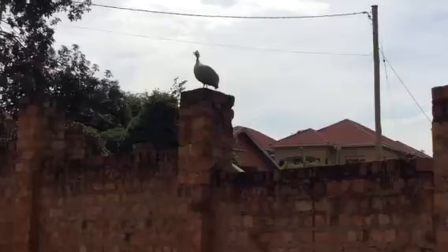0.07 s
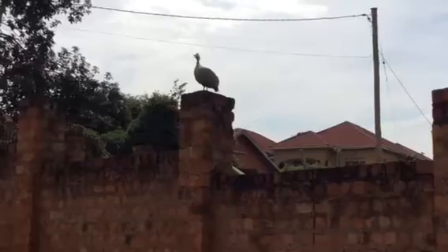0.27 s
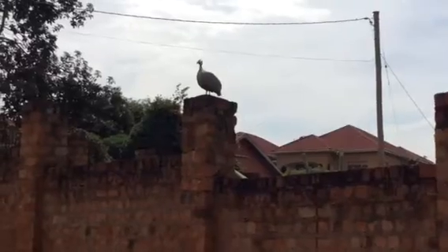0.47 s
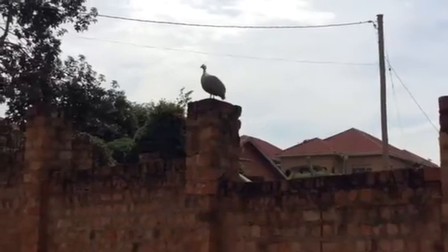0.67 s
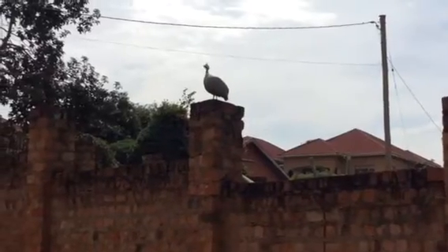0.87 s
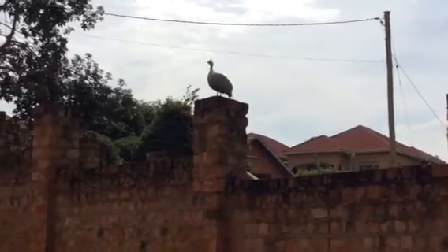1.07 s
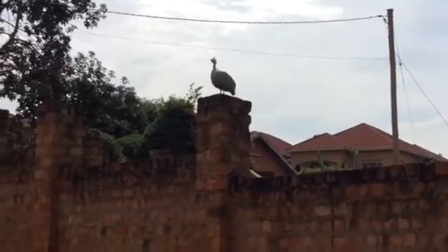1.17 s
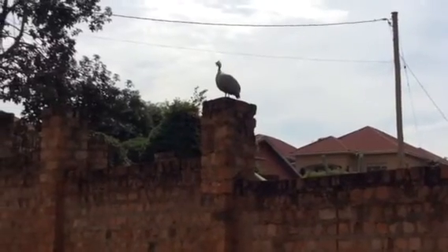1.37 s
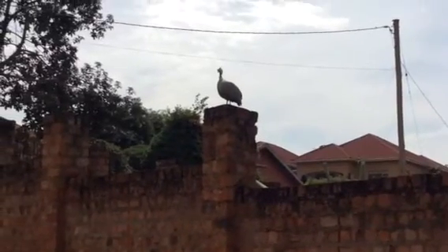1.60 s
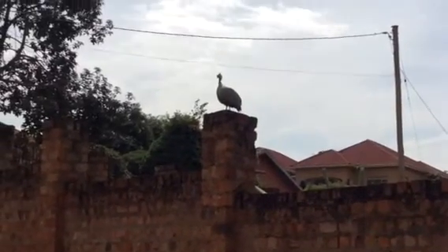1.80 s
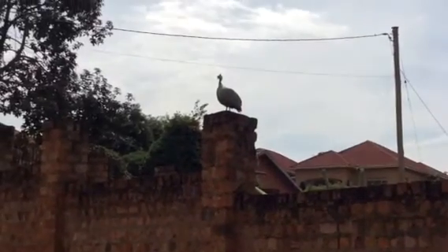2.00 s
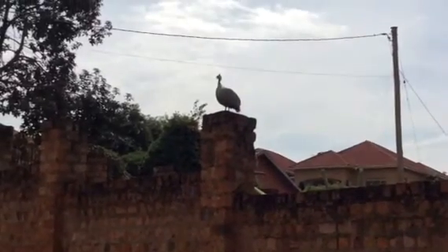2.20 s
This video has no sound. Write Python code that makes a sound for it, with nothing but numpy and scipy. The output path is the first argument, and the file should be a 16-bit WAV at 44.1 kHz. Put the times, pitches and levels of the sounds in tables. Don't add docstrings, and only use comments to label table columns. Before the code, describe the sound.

A guinea fowl gives seven short, harsh, rising calls that ring off nearby yard walls.

```python
import sys
import numpy as np
from scipy import signal
from scipy.fft import rfft, irfft
from scipy.io import wavfile
from scipy.ndimage import uniform_filter1d

SR = 44100
rng = np.random.default_rng(int(sys.argv[2]) if len(sys.argv) > 2 else 0)


def voltage_ratio(level):
    return 10 ** (np.asarray(level, float) / 20)


def digitize_waveform(pressure):
    field = np.atleast_2d(pressure).T
    bounded = np.clip(field, -1, 1)
    quanta = np.round(bounded * 32767).astype(np.int16)
    wavfile.write(sys.argv[1], SR, quanta)


N = 99225


def ring(f, hz, width):
    return 1j * f * width / (hz ** 2 - f ** 2 + 1j * f * width)


def shape(x, gain):
    f = np.arange(len(x) // 2 + 1) * SR / len(x) + 1e-3
    return irfft(rfft(x) * gain(f), len(x))


def noise_band(count, hz):
    return shape(rng.standard_normal(count), lambda f: np.exp(-(np.log2(f / hz) * 2) ** 2))


def on_log_hz(hz, table):
    points, values = np.transpose(table)
    return np.interp(np.log(hz), np.log(points), values)


def level(x, db):
    return x * voltage_ratio(db) / np.sqrt(np.mean(x ** 2))


def unit_energy(x):
    return x / np.sqrt(np.sum(x ** 2))


def walk(rate):
    hold = int(SR / rate)
    steps = np.repeat(rng.standard_normal(N // hold + 1), hold)
    return 1.28 * uniform_filter1d(uniform_filter1d(steps, hold), hold)[:N]


def add(out, x, s):
    i = int(s * SR)
    out[i:i + len(x)] += x[:len(out) - i]


# [hz, level_db per Hz]
TOWN_SPECTRUM = [(15, -43), (25, -29), (59, -4), (523, -13.5), (684, -13), (872, -21.5), (1140, -17),
                 (1240, -16.5), (15500, -34)]


def town():
    swell_db, flicker_db = 0.1, 2
    out, swell = 0, walk(1.43)
    for hz in 25 * 2 ** np.arange(0, 9.6, .5):
        band = noise_band(N, hz)
        db = on_log_hz(hz, TOWN_SPECTRUM)
        out = out + band * voltage_ratio(db + swell_db * swell + flicker_db * walk(8.88))
    return level(out, -66)


def throat_pulses(length, hz0, hz1, dip_db, chance):
    jitter, shimmer_db = .009, 1.6
    rise_share = 0.7685
    attack_s, release_s = .011, 0.022
    t = np.zeros(len(chance))
    for k in range(1, len(t)):
        climb = min(t[k - 1] / length / rise_share, 1)
        hz = hz0 + (hz1 - hz0) * np.sin(np.pi / 2 * climb)
        t[k] = t[k - 1] + (1 + jitter * chance[k, 0]) / hz
    effort = np.clip((t + attack_s / 5) / attack_s, 0, 1) * np.clip((length - t) / release_s, 0, 1)
    dip = np.exp(-((t / length - 0.62) / 0.065) ** 2)
    return t, effort * voltage_ratio(shimmer_db * chance[:, 1] + dip_db * dip)


# [shut_hz, open_hz, width_hz, shut_db, open_db]
TRACT_RESONANCES = [(2095, 1704, 523, 2.5, 0.5), (2500, 2386, 870, -10, -19.5), (3493, 4370, 530, -4, 2.5),
                    (4220, 4757, 800, -6, 0), (5260, 5050, 214, -24, -4.5), (6500, 6840, 218, -20, -8.5),
                    (8350, 7740, 3880, -29.5, -16), (11600, 14760, 2000, -58, -24)]


def tract(f, t, length, chest_db, stretch, upper_db, late_db):
    beak = (1 - np.exp(-t / .022))[:, None]
    late = np.clip(2 * t / length - 1, -1, 1)[:, None]
    response = voltage_ratio(chest_db - 13 * beak) * ring(f, 1166, 640) ** 2
    for k, (shut_hz, open_hz, width, shut_db, open_db) in enumerate(TRACT_RESONANCES):
        db = shut_db + (open_db - shut_db) * beak
        db = db + upper_db * (k in (3, 4)) + late_db * (k == 0) * late
        hz = stretch * (shut_hz + (open_hz - shut_hz) * beak)
        response = response + voltage_ratio(db) * ring(f, hz, width) ** 2
    return response


def pulse_source(f, effort, air, size):
    t = np.arange(air.shape[1]) / SR
    puff = air * np.exp(-t / .0013)
    hiss = np.roll(air, 99, axis=1) * np.exp(-t / 0.0029)
    hiss = hiss / np.sqrt(np.sum(hiss ** 2, axis=1, keepdims=True))
    high = 1 / (1 + (7130 / f) ** 8)
    source = 1 + .5 * rfft(puff / np.sqrt(np.mean(puff ** 2) * air.shape[1]), size)
    source = source * (1 - 0.84 * high) + high * rfft(hiss, size)
    return source * (effort[:, None] + 1e-6) ** (0.27 * high)


# [centre_hz, width_hz, level_db]
NECK_PARTIALS = [(363, 125, -25.5), (730, 310, -28.5)]
# [centre_hz, width_hz, depth (0-1)]
SIDE_CAVITIES = [(5535, 133, 0.54), (8060, 200, 0)]


def call(length, db, hz0, hz1, tilt_db, chest_db, dip_db, stretch, upper_db, late_db):
    size, pulses = 8192, 40
    chance, air = rng.standard_normal((pulses, 2)), rng.standard_normal((pulses, 256))
    t, effort = throat_pulses(length, hz0, hz1, dip_db, chance)
    f = np.arange(size // 2 + 1) * SR / size + 0.00082
    colour = voltage_ratio(tilt_db * np.log2(f / 3000 + 0.033)) / (1 + (520 / f) ** 4)
    voiced = colour * pulse_source(f, effort, air, size)
    voiced = voiced * tract(f, t, length, chest_db, stretch, upper_db, late_db)
    for hz, width, partial_db in NECK_PARTIALS:
        voiced = voiced + voltage_ratio(partial_db) * ring(f, hz, width) ** 2
    for hz, width, depth in SIDE_CAVITIES:
        voiced = voiced * (1 - depth * ring(f, hz, width))
    delay = np.exp(-2j * np.pi * f * t[:, None])
    x = irfft(np.sum(effort[:, None] * voiced * delay, axis=0), size)
    return level(x, db) * np.sqrt(length * SR / size)


# [start_s, length_s, level_db, first_pitch_hz, last_pitch_hz]
CALLS = [
    (.113, 0.069, -43, 340.8, 362),
    (0.393, 0.07, -43, 340, 364.3),
    (0.677, 0.056, -43, 331.2, 360.5),
    (0.945, 0.059, -43.5, 325.5, 367.6),
    (1.177, 0.0635, -44, 338, 366.5),
    (1.47, 0.053, -47.5, 339.5, 359),
    (1.737, 0.0636, -46.5, 325.6, 360.6),
]
# [brightness_db per octave, chest_db, mid_call_effort_db]
POSTURES = [(2.5, -7, -5.5), (2, -11.5, -2.5), (1.5, -7.5, 3), (2.5, -2.5, 4), (0.5, -9.5, 2),
            (-1.5, -13, 2), (0.5, -5, -4)]
# [length scale, upper_resonances_db, first_resonance_late_lift_db]
TRACT_STRETCH = [(1.004, 1.5, -4.5), (1.006, 1.5, -0.5), (1.01, -.5, -1), (0.995, 3.5, -2), (1, 0.5, 1.5),
                 (.99, -2, 0.5), (0.998, -1, -7.5)]


def guinea_fowl():
    out = np.zeros(N)
    for (s, *voice), posture, stretch in zip(CALLS, POSTURES, TRACT_STRETCH):
        add(out, call(*voice, *posture, *stretch), s)
    return out


# [delay_s, level_db]
WALL_ECHOES = [(.011, -3.5), (0.036, -9.5), (0.061, -15), (.085, -17.5), (.118, -24.5)]
# [hz, t60_s]
TAIL_T60 = [(1000, 1), (2000, 0.48), (4500, 0.45), (7000, 0.82), (12000, 0.4)]
# [pitch_hz, level_db, t60_s]
WALL_FLUTTER = [(1822, -25, .8), (4020, -31, .6), (4600, -30, .6)]


def yard(x):
    onset_s = 0.043
    t = np.arange(SR) / SR
    tail = 0
    for hz in 350 * 2 ** np.arange(0, 5.6, .5):
        tail = tail + noise_band(SR, hz) * voltage_ratio(-60 * t / on_log_hz(hz, TAIL_T60))
    tail = voltage_ratio(-11) * unit_energy(tail * (1 - np.exp(-t / onset_s)))
    scatter = rng.standard_normal(SR) * np.exp(-t / 0.0072) * (t > .0005)
    tail = tail + voltage_ratio(-7.5) * unit_energy(scatter)
    for s, db in WALL_ECHOES:
        smear = rng.standard_normal(1024) * np.exp(-t[:1024] / 0.0076)
        add(tail, voltage_ratio(db) * unit_energy(smear), s)
    for hz, db, t60 in WALL_FLUTTER:
        tone = np.sin(2 * np.pi * hz * t) * np.minimum(t / onset_s, 1) / 100
        tail = tail + voltage_ratio(db - 60 * t / t60) * tone
    return x + signal.fftconvolve(x, tail)[:N]


# [start_s, peak_db, length_s]
CASE_BUMPS = [
    (.5765, -48.5, .004),
    (2.085, -53, 0.0067),
    (0.65, -58, .012),
    (0.33, -59, 0.0031),
    (0.13, -58, .009),
]
# [start_s, peak_db, length_s]
CASE_TICK = (1.1027, -49, .0011)
# [peak_db, centre_hz, width_hz, rise_s]
CASE_RUSTLE = (-59, 12000, 7000, .008)


def creaks():
    out, t = np.zeros(N), np.arange(4096) / SR

    def bump(db, length):
        return voltage_ratio(db) * np.sin(np.pi * np.minimum(t / length, 1)) ** 2

    for s, db, length in CASE_BUMPS:
        add(out, bump(db, length), s)
    s, db, length = CASE_TICK
    add(out, -bump(db, length), s)
    add(out, bump(db - 5.5, 2 * length), s + length)
    db, hz, width, rise = CASE_RUSTLE
    fading = rng.standard_normal(len(t)) * np.exp(-t / rise)
    rustle = shape(fading, lambda f: ring(f, hz, width) ** 2)[::-1]
    add(out, rustle * voltage_ratio(db) / np.abs(rustle).max(), s + length - len(t) / SR)
    return shape(out, lambda f: 1j * f / (1j * f + 40))


# [start_s, length_s, pitch_hz, level_db]
DOVE_COOS = [
    (1.43, 0.23, 571.6, -68),
    (1.67, 0.081, 546, -69),
    (1.79, 0.11, 542, -67),
    (2.02, 0.088, 527, -68.5),
    (2.19, 0.055, 527, -67),
]


def dove():
    out = np.zeros(N)
    waver = walk(30.07)
    for s, length, hz, db in DOVE_COOS:
        u = np.arange(int(length * SR)) / SR
        start = int(s * SR)
        edge = np.clip(np.minimum(u, length - u) / .03, 0, 1)
        loudness = voltage_ratio(db + 2.5 * waver[np.minimum(start + np.arange(len(u)), N - 1)])
        drift = waver[::-1][int(s * SR / 2):][:len(u)]
        pitch = hz * (1 - .03 * u / length + 0.009 * drift)
        add(out, loudness * edge * np.sin(2 * np.pi * np.cumsum(pitch) / SR), s)
    return out


def small_bird():
    start_s, gap_s, note_s, hz = 1.905, 0.027, 0.017, 5400
    out = np.zeros(N)
    u = np.linspace(0, 1, int(note_s * SR))
    chirp = np.sin(np.pi * u) * np.sin(2 * np.pi * np.cumsum(hz * (1 - .06 * u)) / SR)
    for k in range(5):
        flutter = rng.standard_normal(len(u) // 64 + 1).repeat(64)[:len(u)]
        add(out, voltage_ratio(-71 + 2.5 * flutter) * chirp, start_s + k * gap_s)
    return out


def scene():
    return (yard(guinea_fowl()) + dove() + small_bird() + creaks() + town())[None]


def low_pass(x):
    return signal.sosfilt(signal.butter(12, 15400, fs=SR, output="sos"), x)


def record(dry):
    on = np.clip((np.arange(N) / SR - .1195) / 0.0028, 0, 1)
    heard = shape(dry[0], lambda f: 1 / np.sqrt(1 + (f / 13100) ** 12))[None]
    mix = heard * on + voltage_ratio(-107) * rng.standard_normal(N)
    return low_pass(mix)


dry = scene()
out = record(dry)
digitize_waveform(out)
```